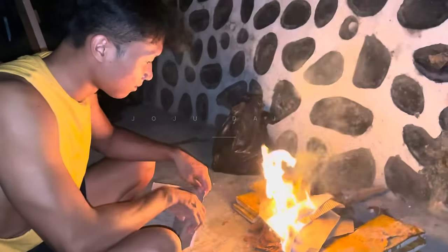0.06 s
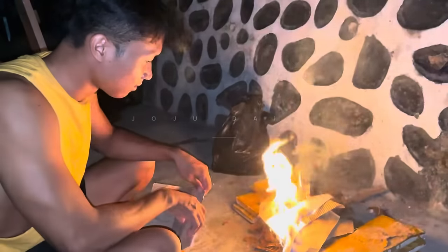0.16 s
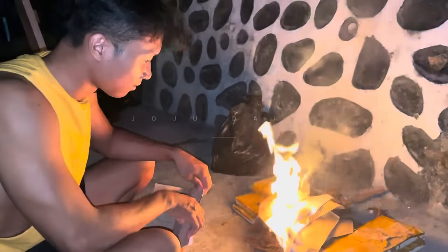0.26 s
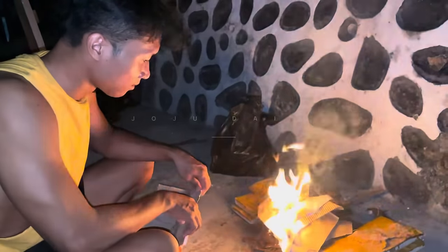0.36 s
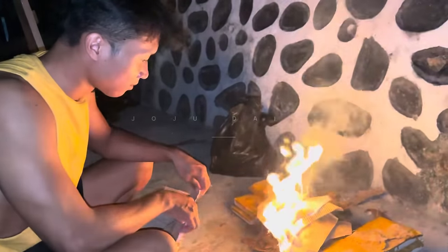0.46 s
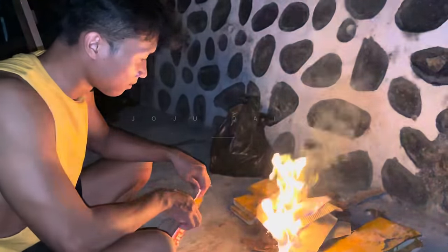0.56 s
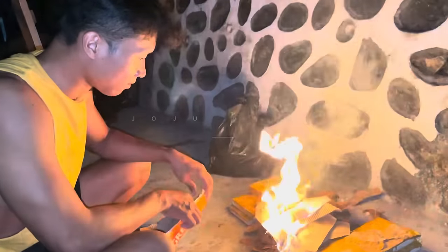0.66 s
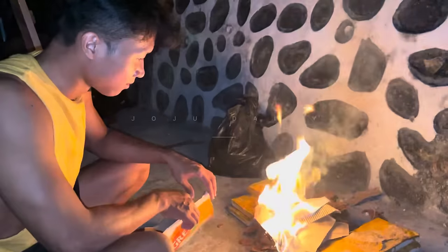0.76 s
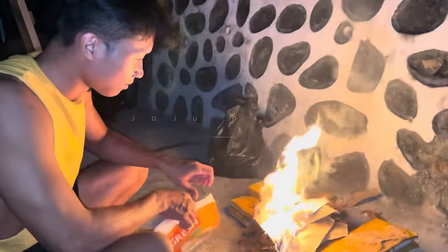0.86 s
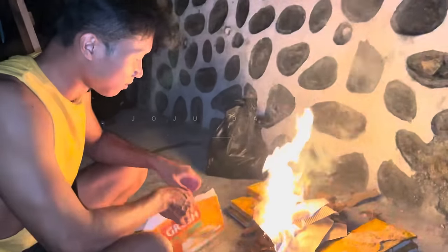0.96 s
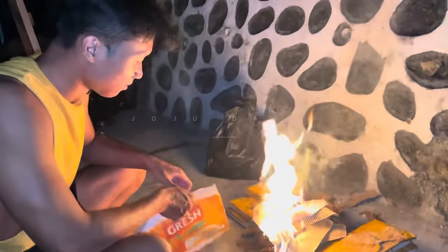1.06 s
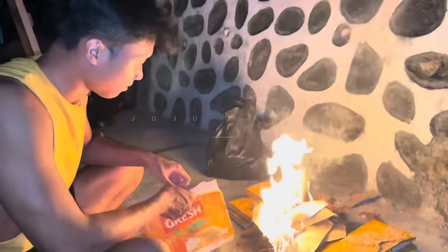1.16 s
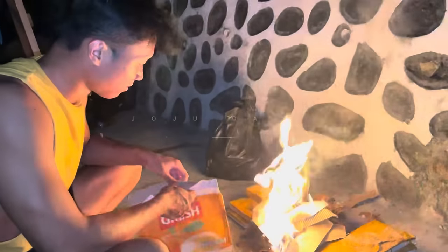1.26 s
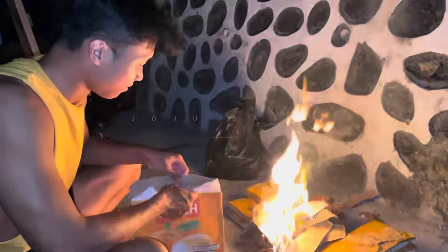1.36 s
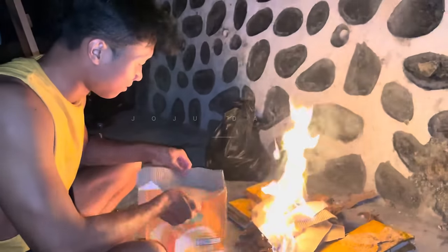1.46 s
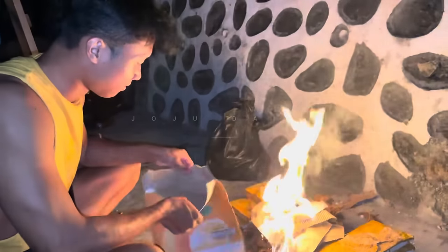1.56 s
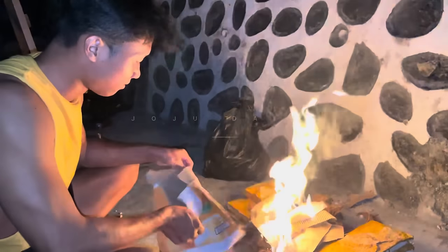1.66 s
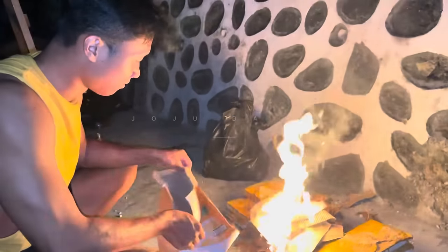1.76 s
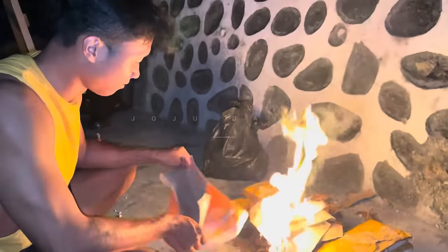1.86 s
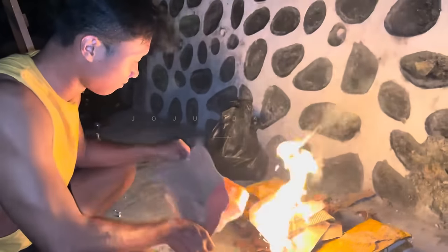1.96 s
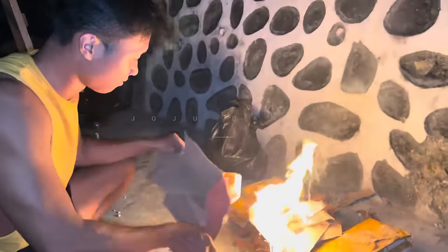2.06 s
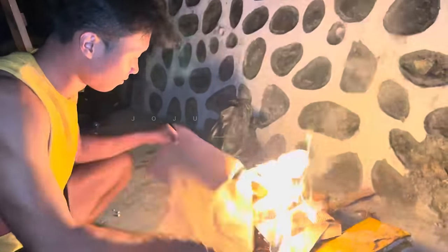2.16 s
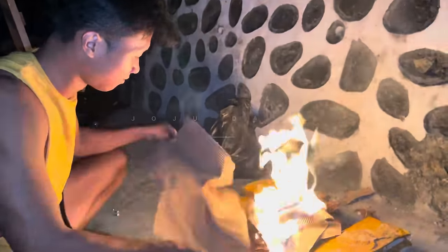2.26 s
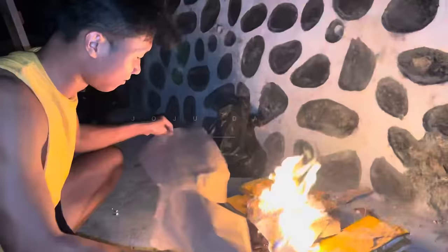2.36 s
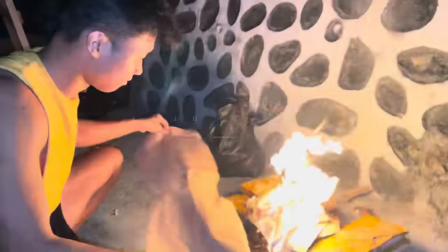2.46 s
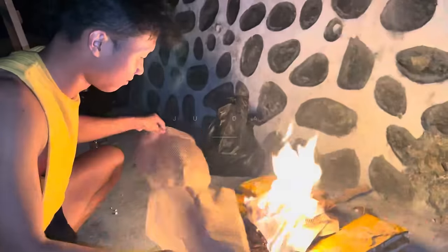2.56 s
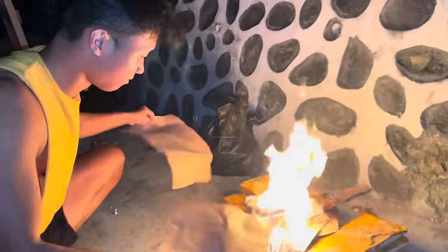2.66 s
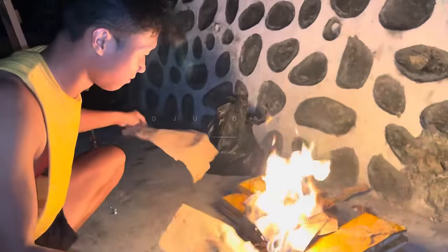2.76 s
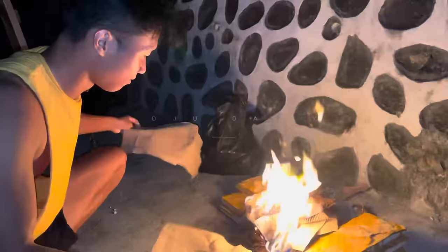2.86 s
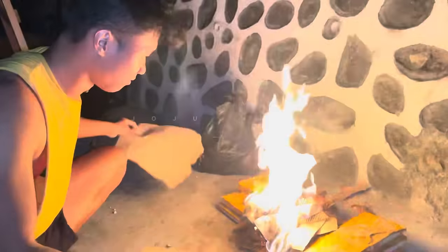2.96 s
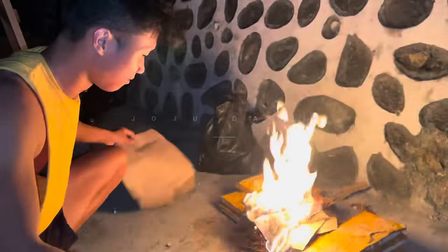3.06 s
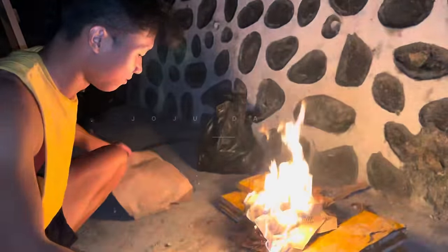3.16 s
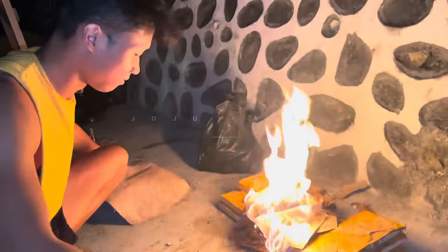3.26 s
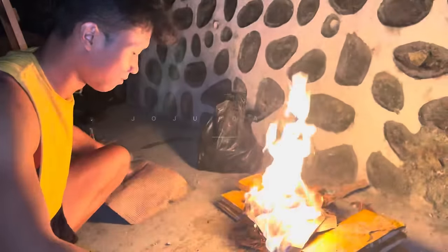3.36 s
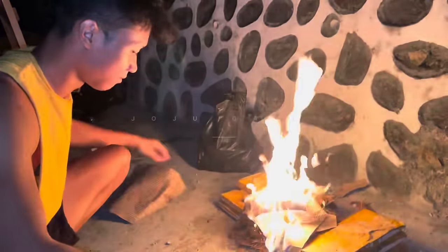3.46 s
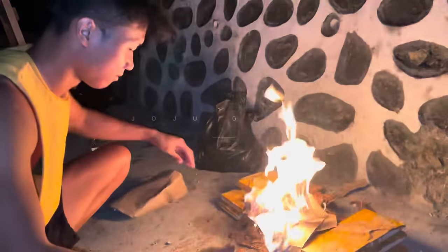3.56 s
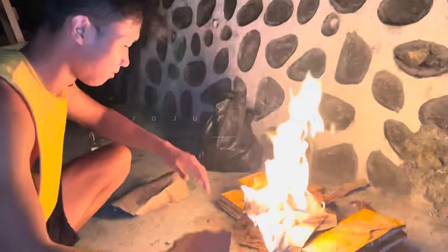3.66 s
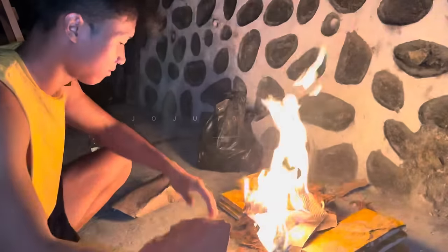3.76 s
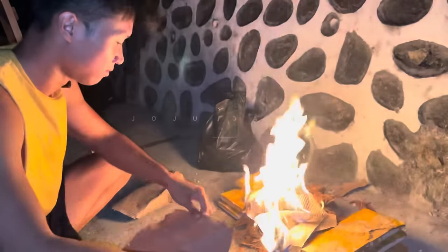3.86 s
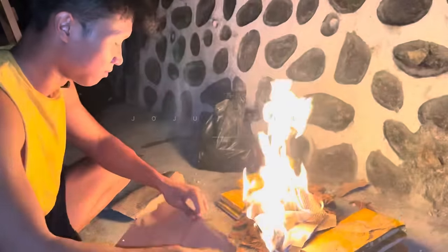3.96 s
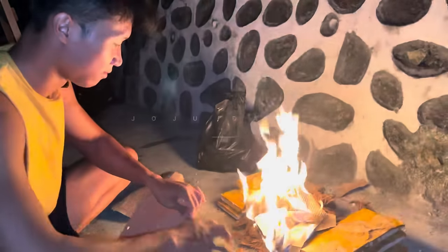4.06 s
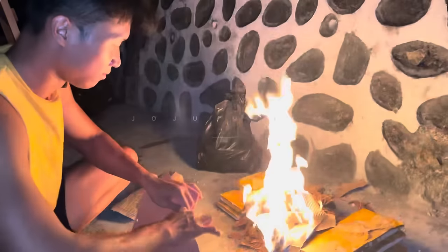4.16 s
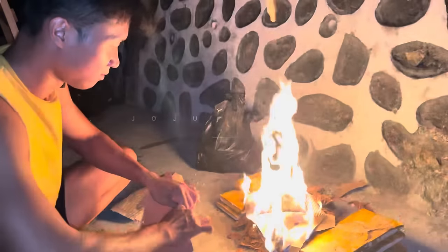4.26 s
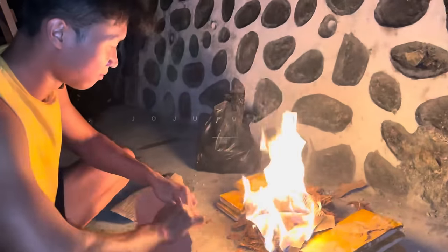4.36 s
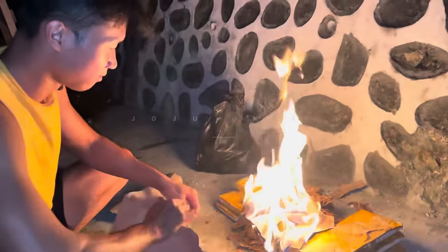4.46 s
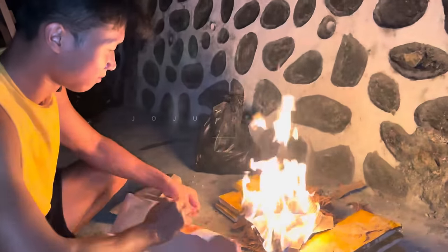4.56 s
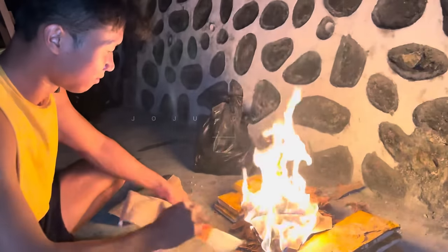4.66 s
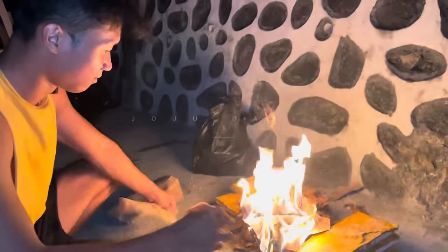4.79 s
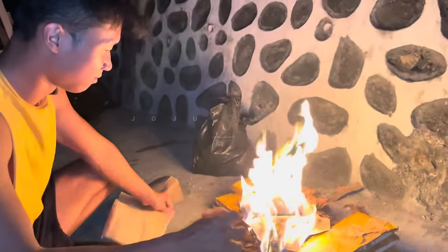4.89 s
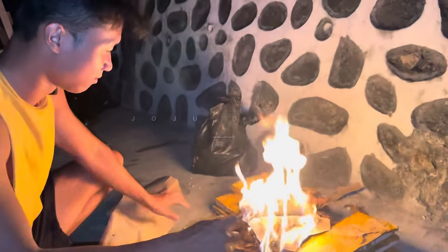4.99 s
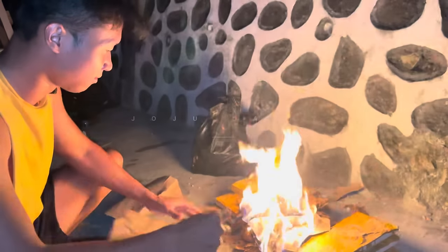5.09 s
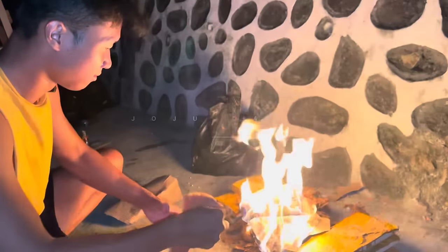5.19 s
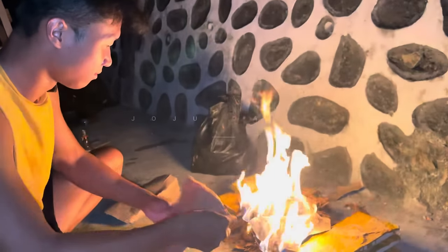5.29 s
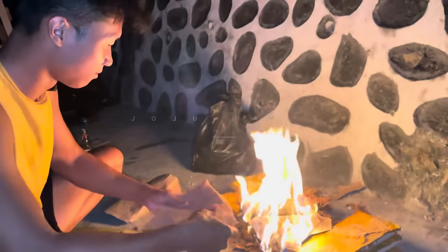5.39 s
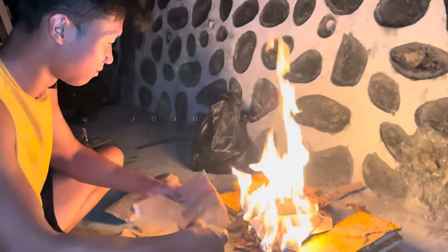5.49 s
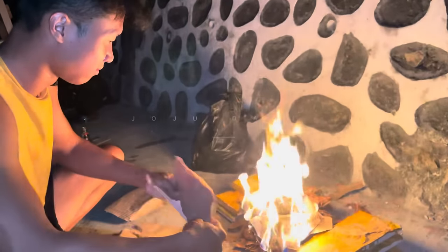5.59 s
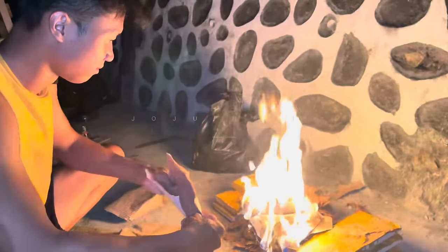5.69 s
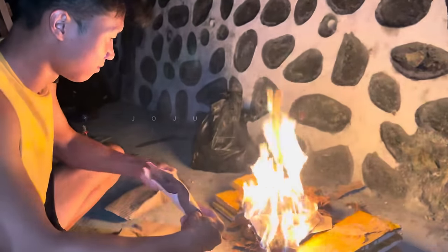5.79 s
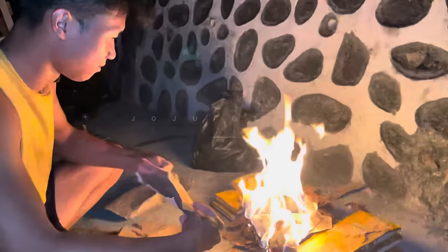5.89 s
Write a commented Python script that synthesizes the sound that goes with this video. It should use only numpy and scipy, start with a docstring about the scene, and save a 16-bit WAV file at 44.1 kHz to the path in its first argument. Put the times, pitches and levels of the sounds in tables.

```python
"""A cardboard carton is picked up, pulled open and torn in two long rips in a stone room.
Fibres snap in a dense rasp that shakes the panels; creases crack, and the board squeaks,
knocks and slides under the hands. A small fire beside it rumbles, ticks and sizzles faintly.
A faint low hum comes and goes."""
import sys
import numpy as np
from scipy import signal
from scipy.fft import rfft, irfft
from scipy.io import wavfile

SR = 44100
rng = np.random.default_rng(int(sys.argv[2]) if len(sys.argv) > 2 else 0)


def wav_record(signal):
    """Record a signal, one row per channel, as 16-bit PCM in the file named by sys.argv[1]."""
    frames = np.transpose(np.atleast_2d(signal))
    bounded = np.clip(frames, -1, 1)
    # unit amplitude maps onto the largest positive 16-bit level
    quanta = np.round(bounded * 32767).astype(np.int16)
    wavfile.write(sys.argv[1], SR, quanta)


N = 261468
TIME = np.arange(N) / SR

# tearing effort, one curve per pull: time_s, effort_db
PULLS = [
    [(1.49, -43), (1.518, -26), (1.524, -26.5), (1.57, -16.5), (1.59, -28), (1.606, -18), (1.63, -27),
     (1.68, -27)],
    [(1.68, -31), (1.698, -18), (1.714, -28.5), (1.738, -19), (1.762, -28.5), (1.884, -23.5), (1.894, -30),
     (1.94, -16.5)],
    [(1.94, -19), (1.954, -14.5), (2.106, -20.5), (2.258, -10.5), (2.305, -36.5)],
    [(2.305, -36), (2.313, -41), (2.321, -20.5), (2.349, -14.5), (2.407, -11.5), (2.461, -22.5),
     (2.571, -19.5), (2.62, -43)],
    [(2.62, -39), (2.628, -38.5), (2.658, -20.5), (2.7, -17), (2.744, -59), (2.77, -56)],
    [(4.41, -88.5), (4.424, -36.5), (4.432, -26), (4.534, -17.5), (4.746, -18), (4.772, -13),
     (4.838, -21.5), (4.9, -65.5)],
]
# parting fibres: freq_hz, density_db
FIBRE_SPECTRUM = [(1530, -25.5), (2600, -4), (3260, -9.5), (3750, -4), (4570, -2.5), (8250, -2), (11700, 0),
                  (13400, 2), (14000, -10.5)]
# panel resonances while tearing: freq_hz, width_hz, level_db
TEAR_MODES = [(960, 160, 0.5), (1233, 830, 11), (1740, 320, 5), (2116, 340, 1)]
# boom of the hollow carton: freq_hz, density_db
HOLLOW_SPECTRUM = [(60, -37.5), (170, -36.5), (270, -22), (370, -1), (480, 1), (610, 5), (760, -10.5),
                   (1100, -13), (2500, -52)]
# flaps of the loose sheet: peak_s, half_length_s, level_db
FLAPS = [(1.57, 0.027, -49), (1.74, 0.098, -48.5), (1.99, 0.025, -35), (2.226, 0.069, -32.5),
         (2.374, .04, -33.5), (4.57, 0.045, -51.5)]
# flapping sheet: freq_hz, density_db
SHEET_SPECTRUM = [(20, -23.5), (45, -17), (110, 1.5), (190, -5), (270, -6), (500, -29.5), (1500, -68.5)]
# creases and glued spots giving way: start_s, thud_db, pitch_hz, crack_db
SNAPS = [(1.136, -5.5, 964, -20), (1.506, -1, 936, -30.5), (1.524, -4.5, 1482, -15.5),
         (1.534, -11, 1035, -14.5), (1.562, -8, 900, -17), (1.597, -13.5, 1640, -18), (1.638, -7, 981, -28),
         (1.696, -3, 826, -7), (1.707, -18, 597, -19), (1.742, -20.5, 1465, -17), (1.777, -6, 980, -23),
         (1.809, -1.5, 1067, -14.5), (1.839, -9, 1471, -20.5), (1.871, -1.5, 1312, -12),
         (1.88, -3.5, 1115, -14), (1.912, -3.5, 1032, -11.5), (1.957, 0, 1380, -7.5),
         (1.969, -6.5, 1023, -7), (1.998, 1, 1082, -9.5), (2.232, -10, 934, -21), (2.694, -15, 1092, -17),
         (4.481, -3, 1100, -30), (4.553, -9.5, 767, -26.5), (4.581, -4, 1210, -11.5),
         (4.786, -3.5, 1264, -19)]
# board hitting hands and floor: start_s, thud_db, pitch_hz, bounce_step_db
KNOCKS = [(0.972, -29, 1010, 0), (1.075, -21.5, 1010, -7), (1.123, -9, 1100, -17), (1.376, -37, 1600, -5),
          (2.318, -14.5, 930, -10), (3.174, -19, 1380, -11.5), (3.201, -15.5, 750, -4.5),
          (3.482, -26, 617, -11), (3.742, -35.5, 693, -3), (3.932, -23.5, 502, -3.5), (4.003, -33, 530, -7),
          (4.106, -38.5, 535, -16), (4.459, -10.5, 640, -1.5), (5.08, -35, 800, 1.5),
          (5.255, -26.5, 780, -8), (5.374, -27.5, 923, -5), (5.422, -29, 587, -2.5),
          (5.484, -22, 955, -6.5), (5.537, -29, 910, -3.5), (5.614, -9, 1040, -1.5), (5.628, -12, 835, -10),
          (5.653, 2, 1060, -7.5), (5.669, -7.5, 954, -6), (5.795, -33, 960, -5)]
# carton modes shaken by a blow: freq_hz, level_db, t60_s
CARTON_MODES = [(224, -19.5, 0.015), (319, -15.5, 0.043), (400, -10.5, 0.027), (616, -10, 0.022),
                (978, -13, 0.01), (1099, -8.5, 0.026), (1500, -18, 0.048), (1770, -12.5, 0.022),
                (2380, -27, 0.042)]
# crack of a blow: freq_hz, density_db
CRACK_SPECTRUM = [(300, -30), (1500, 7.5), (3000, -2), (4500, -1.5), (7500, 1.5), (10000, -13),
                  (14000, -5.5)]
# radiation of a small panel, weak in the bass: freq_hz, gain_db
RADIATION = [(30, -39), (120, -14), (220, 0), (320, 5), (14000, -0.5)]
# squeaks and booms of slipping board: peak_s, half_length_s, pitch_hz, level_db
SLIPS = [(0.994, 0.014, 1050, -35), (1.14, 0.0108, 293, -32), (1.141, 0.0039, 2620, -23.5),
         (1.356, 0.015, 6570, -42), (1.378, 0.003, 2290, -34), (1.574, 0.046, 260, -35),
         (1.84, 0.0046, 1280, -16.5), (2.244, 0.037, 520, -20), (2.252, 0.009, 4930, -22),
         (2.777, 0.017, 4700, -52.5), (3.334, 0.036, 663, -42.5), (3.485, 0.016, 646, -45.5),
         (4.505, 0.024, 367, -27), (4.57, 0.023, 185, -35), (4.765, 0.027, 4390, -19.5),
         (5.48, 0.017, 382, -39), (5.661, 0.035, 230, -35.5)]
# strokes over skin or floor: peak_s, half_length_s, hiss_db, ring_db
SLIDES = [(0.278, 0.017, -45.5, -49), (0.434, .024, -54, -53), (0.626, 0.03, -46, -54),
          (0.986, 0.019, -46.5, -44), (1.098, 0.022, -39, -38.5), (1.147, 0.039, -49, -56),
          (1.266, 0.022, -53.5, -52.5), (1.364, 0.032, -44.5, -50.5), (1.374, 0.0032, -31.5, -68),
          (1.492, 0.053, -49.5, -59), (3.193, 0.024, -40, -36.5), (3.331, 0.027, -41.5, -42.5),
          (3.656, 0.031, -57.5, -56.5), (4.007, 0.015, -48.5, -69.5), (4.11, 0.0079, -44, -53.5),
          (4.253, .03, -51.5, -60), (5.023, 0.11, -59, -63.5), (5.081, 0.012, -45.5, -43.5),
          (5.292, 0.016, -41, -43.5), (5.453, 0.062, -48, -53), (5.597, 0.026, -45, -47),
          (5.659, 0.026, -41, -38), (5.846, 0.041, -35.5, -43.5), (5.92, 0.087, -36.5, -47.5)]
# friction hiss: freq_hz, density_db
RUB_SPECTRUM = [(1530, -76), (2600, -22), (3620, -6.5), (5080, 0), (7690, 0.5), (9770, 2), (13400, 5),
                (14000, -1)]
# resonances of rubbed board: freq_hz, width_hz, level_db
RUB_MODES = [(390, 340, -5), (648, 110, -8), (1076, 1060, 4.5), (1407, 780, -4.5), (2102, 260, -0.5)]
# rush of the flames: freq_hz, density_db
FIRE_SPECTRUM = [(20, -2), (50, 0), (90, 1), (150, 0.5), (220, -2.5), (320, -6.5), (500, -12.5),
                 (900, -12.5), (1400, -20.5), (2800, -27), (6000, -28.5), (14000, -28.5)]
# gas jets from the burning fuel: start_s, length_s, pitch_hz, width_hz, level_db
WHISTLES = [(.05, 0.37, 12300, 1500, -65), (0.278, 0.13, 11240, 130, -59),
            (3.906, 0.21, 12700, 1093, -57.5)]
# decay of the stone room: freq_hz, t60_s
ROOM_DECAY = [(150, .2), (500, 0.1), (1500, 0.16), (5000, .16), (14000, 0.1)]


def tearing(seam_open_s=2.2, opening_s=0.027, whole_boost_db=4.5, spurt_db=-14, spurt_s=0.0043):
    """Fibres part in clumps; larger bundles tug the panels, the hollow carton and the loose sheet."""
    effort_db = np.max([np.interp(TIME, *np.transpose(pull), -120, -120) for pull in PULLS], axis=0)
    # each snap lets the tear run on briefly
    spurts = sum(gain_of(crack_db + spurt_db) * (TIME > start_s) * np.exp(-abs(TIME - start_s) / spurt_s)
                 for start_s, _, _, crack_db in SNAPS)
    # 1 -> 0 as the seam opens; a whole carton rings more and tears more jerkily
    whole = (1 - np.tanh((TIME - seam_open_s) / opening_s)) / 2
    ring_db = -5 + 1.255 * (effort_db + 5) + whole_boost_db * whole  # grows faster than the rasp
    flaps = sum(gain_of(level_db) * swell(peak_s, half_s) for peak_s, half_s, level_db in FLAPS)
    clumps = gain_of((1.46 + 0.1 * whole) * wander(rate_hz=110))
    bundles = clicks(per_s=1400, spread_db=3) * clumps
    fibres = clicks(per_s=14000, spread_db=-1.5) * clumps + (1 + whole) / 2 * bundles
    panels = ringing(bundles, TEAR_MODES, drift=0.07, drift_hz=14)
    panels = signal.sosfilt(signal.butter(2, 180, "high", fs=SR, output="sos"), panels)
    return ((gain_of(effort_db) + spurts) * unit_rms(colour(fibres, FIBRE_SPECTRUM))
            + gain_of(ring_db - 1.5) * panels
            + gain_of(ring_db - 7.5) * unit_rms(colour(bundles, HOLLOW_SPECTRUM))
            + gain_of(-1) * flaps * unit_rms(colour(bundles, SHEET_SPECTRUM)))


def ringing(drive, modes, drift, drift_hz):
    """Board resonances, each drifting on its own as the sheet bends."""
    out = np.zeros(N)
    for freq_hz, width_hz, level_db in modes:
        bent_hz = freq_hz * np.exp(drift * wander(drift_hz))
        out += gain_of(level_db) * unit_rms(resonate(drive, bent_hz, width_hz))
    return unit_rms(out)


def snaps_and_knocks(delay_s=0.0015, rebound_s=0.011, uneven=0.15):
    """A snap is one bright, dry blow in taut board; a knock is duller, hollower and bounces twice."""
    out = np.zeros(N)
    for start_s, thud_db, pitch_hz, crack_db in SNAPS:
        add(out, start_s + delay_s, blow(thud_db, pitch_hz, crack_db, carton_db=-4, crumble=0.22))
    for start_s, thud_db, pitch_hz, bounce_step_db in KNOCKS:
        for bounce in range(3):
            stretch, detune = 1 + uneven * min(bounce, 1) * rng.uniform(-1, 1, 2)
            level_db = thud_db + bounce * bounce_step_db
            crack_db = 1.18 * level_db - 21  # weaker blows are duller
            knock = blow(level_db, pitch_hz * detune, crack_db, carton_db=0.5, crumble=0.34)
            add(out, start_s + delay_s + bounce * stretch * rebound_s, knock)
    return colour(out, RADIATION)


def blow(thud_db, pitch_hz, crack_db, carton_db, crumble, crack_s=0.0023, crumble_s=0.017):
    """A crack and a short crumble; the struck panel swings up and shakes the carton."""
    rise_s, panel_t60_s = 0.0003, 0.02
    t = np.arange(SR // 8) / SR
    freq_hz, level_db, t60_s = np.transpose(CARTON_MODES)[:, :, None]
    detune = 1 + 0.06 * rng.standard_normal(freq_hz.shape)
    phase = 2 * np.pi * (freq_hz * detune * t + rng.random(freq_hz.shape))
    carton = (gain_of(carton_db + level_db - 60 * t / t60_s) * np.sin(phase)).sum(0)
    panel = gain_of(-1 - 60 * t / panel_t60_s) * np.sin(2 * np.pi * pitch_hz * t)
    thud = (1 - np.exp(-t / rise_s)) * (panel + carton)
    noise = unit_rms(colour(rng.standard_normal(len(t)), CRACK_SPECTRUM))
    crack = noise * (np.exp(-t / crack_s) + crumble * np.exp(-t / crumble_s))
    return gain_of(thud_db - 6) * thud + gain_of(crack_db) * crack


def slipping(relative_width=0.23):
    """Quick slips drive one resonance of a panel or a taut edge."""
    friction = clicks(per_s=7600, spread_db=-0.5)
    out = np.zeros(N)
    for peak_s, half_s, pitch_hz, level_db in SLIPS:
        span = abs(TIME - peak_s) < 3 * half_s
        ring = resonate(friction[span], np.full(span.sum(), pitch_hz), relative_width * pitch_hz)
        out[span] += gain_of(level_db) * swell(peak_s, half_s)[span] * unit_rms(ring)
    return out


def sliding(fade_share=0.66):
    """Fine friction grains swell and fade with each stroke; coarser catches ring the board."""
    hiss_gain, ring_gain = np.zeros((2, N))
    for peak_s, half_s, hiss_db, ring_db in SLIDES:
        stroke = swell(peak_s, 2 * half_s * np.where(TIME < peak_s, 1 - fade_share, fade_share))
        hiss_gain += gain_of(hiss_db) * stroke
        ring_gain += gain_of(ring_db) * stroke
    grip = gain_of(1.7 * wander(rate_hz=110))
    grains = clicks(per_s=10000, spread_db=3) * grip
    catches = clicks(per_s=2400, spread_db=3.5) * grip
    return (hiss_gain * unit_rms(colour(grains, RUB_SPECTRUM))
            + ring_gain * ringing(catches, RUB_MODES, drift=0.051, drift_hz=13))


def fire(rush_db=-53, flutter=0.11):
    """A steady rush whose bass flutters with the flames; escaping gas whistles thinly."""
    rush = gain_of(rush_db) * unit_rms(colour(rng.standard_normal(N), FIRE_SPECTRUM))
    bass = signal.sosfilt(signal.butter(2, 400, fs=SR, output="sos"), rush)
    out = rush + flutter * wander(rate_hz=9) * bass
    for start_s, length_s, pitch_hz, width_hz, level_db in WHISTLES:
        jet = unit_rms(resonate(rng.standard_normal(N), np.full(N, pitch_hz), width_hz))
        out += gain_of(level_db) * jet * np.sin(np.pi * np.clip((TIME - start_s) / length_s, 0, 1))
    return out


def embers(level_db=-71, decay_s=0.004):
    """Burning board crumbles in tiny dull ticks."""
    t = np.arange(SR // 30) / SR
    crumble = rng.standard_normal(len(t)) * np.exp(-t / decay_s)
    ticks = signal.oaconvolve(clicks(per_s=18, spread_db=3.5), crumble)[:N]
    return gain_of(level_db) * unit_rms(colour(ticks, [(300, -10), (1200, -5), (3000, -11), (13000, -12)]))


def hum(pitch_hz=196, peak_s=3.7, half_s=0.63, level_db=-54.5):
    """A faint, wavering low tone that swells once."""
    phase = 2 * np.pi * np.cumsum(pitch_hz + 2 * wander(rate_hz=19)) / SR
    return gain_of(level_db) * swell(peak_s, half_s) * np.sin(phase)


def room(x, early_db=-10.5, early_decay_s=0.012, tail_db=-24.5, echoes_per_s=2500):
    """First reflections shift as the hands move the board; the stone walls add a short tail."""
    t = np.arange(SR // 2) / SR
    taps = rng.choice([-1., 1.], (4, len(t))) * (rng.random((4, len(t))) < echoes_per_s / SR)
    poses = taps[1:] * (t > 0.002) * np.exp(-t / early_decay_s)  # one response per board position
    poses /= np.linalg.norm(poses, axis=1, keepdims=True)
    reflections = signal.fftconvolve(x[None], poses, axes=1)[:, :N]
    weights = np.array([wander(rate_hz=4) for _ in poses])
    early = (reflections * weights).sum(0) / np.linalg.norm(weights, axis=0)
    freq_hz, age_s, bands = signal.stft(taps[0] * (t > 0.008), SR, nperseg=256)
    bands = bands * gain_of(-60 * age_s / log_interp(ROOM_DECAY, freq_hz)[:, None])
    tail = signal.istft(bands, SR, nperseg=256)[1][:len(t)]
    late = signal.fftconvolve(x, tail / np.linalg.norm(tail))[:N]
    return (x + gain_of(early_db) * early + gain_of(tail_db) * late) / np.hypot(1, gain_of(early_db))


def gain_of(db):
    return 10 ** (np.asarray(db) / 20)


def unit_rms(x):
    return x / np.sqrt(np.mean(x ** 2) + 1e-20)


def log_interp(points, at_hz):
    freq_hz, value = np.transpose(points)
    return np.interp(np.log(at_hz + 1), np.log(freq_hz + 1), value)


def add(mix, start_s, sound):
    part = mix[max(round(start_s * SR), 0):][:len(sound)]
    part += sound[:len(part)]


def swell(peak_s, half_s):
    return np.exp(-((TIME - peak_s) / half_s) ** 2)


def colour(x, spectrum, size=4096):
    """Minimum-phase filter: clicks keep their sharp fronts."""
    log_gain = np.log(gain_of(log_interp(spectrum, abs(np.fft.fftfreq(size, 1 / SR)))))
    taps = np.fft.ifft(np.exp(np.conj(signal.hilbert(log_gain)))).real[:size // 2]
    return signal.oaconvolve(x, taps)[:len(x)]


def wander(rate_hz):
    """Low-passed noise, rms 1."""
    freq_hz = np.fft.rfftfreq(N, 1 / SR)
    return unit_rms(irfft(rfft(rng.standard_normal(N)) / (1 + (freq_hz / rate_hz) ** 4), N))


def resonate(x, centre_hz, width_hz):
    """Steep resonance following the curve centre_hz."""
    carrier = np.exp(2j * np.pi * np.cumsum(centre_hz) / SR)
    pole = np.exp(-np.pi * width_hz / SR)
    baseband = signal.lfilter([(1 - pole) ** 2], [1, -2 * pole, pole * pole], x / carrier + 1e-18)
    return (carrier * baseband).real


def clicks(per_s, spread_db):
    """Random impulses; a few are larger (spread_db > 0) or smaller (< 0) than the rest."""
    size = gain_of(spread_db * np.minimum(rng.exponential(1, N), 2.8))
    return unit_rms(size * rng.choice([-1, 1], N) * (rng.random(N) < per_s / SR))


def scene():
    """Cardboard and embers in the room, over the fire and the hum; mono."""
    cardboard = tearing() + slipping() + sliding() + snaps_and_knocks()
    return (room(cardboard + embers()) + fire() + hum())[None]


def record(dry, cutoff_hz=14300):
    """Clip at full scale, then low-pass."""
    lowpass = signal.firwin(511, cutoff_hz, window=("kaiser", 8), fs=SR)
    return signal.oaconvolve(np.clip(dry, -1, 1), lowpass[None], "same")


dry = scene()
out = record(dry)
wav_record(out)
```